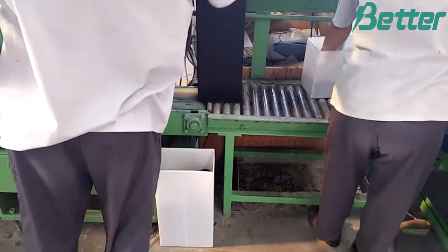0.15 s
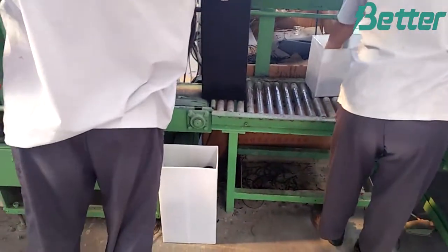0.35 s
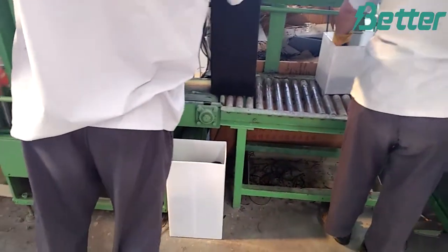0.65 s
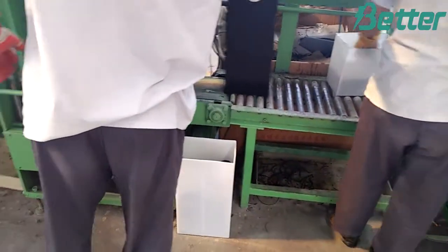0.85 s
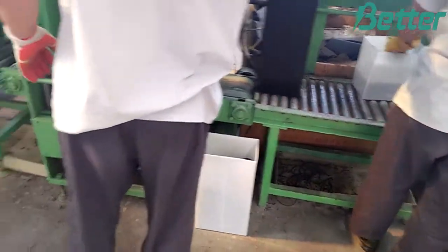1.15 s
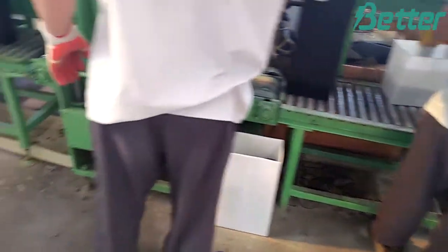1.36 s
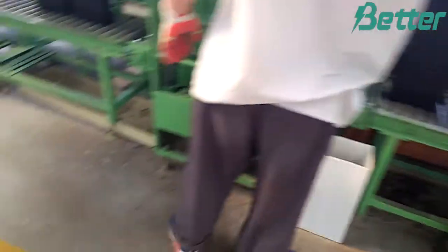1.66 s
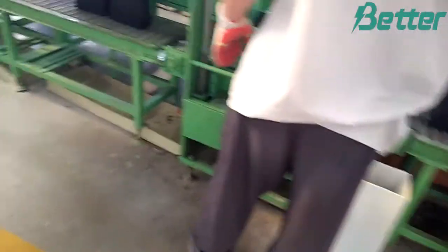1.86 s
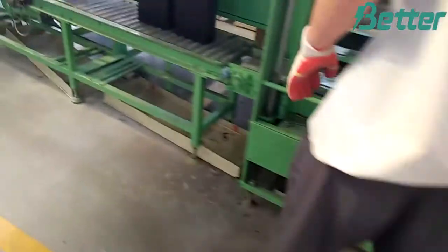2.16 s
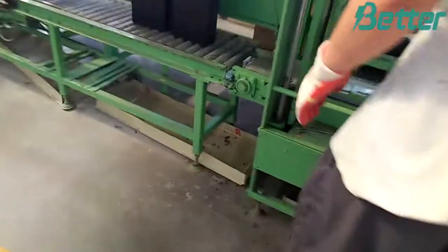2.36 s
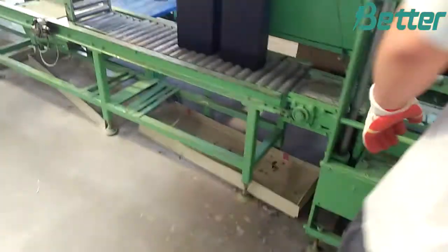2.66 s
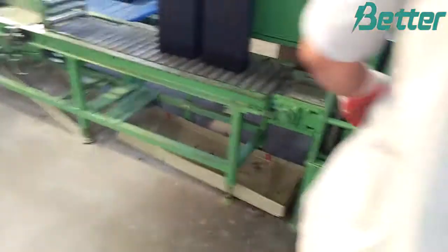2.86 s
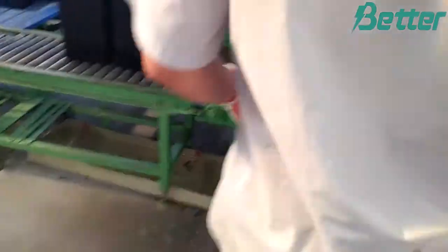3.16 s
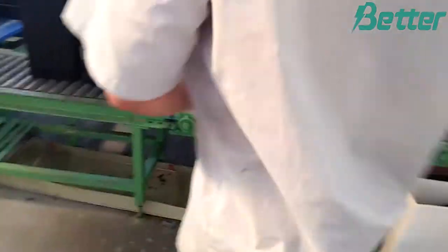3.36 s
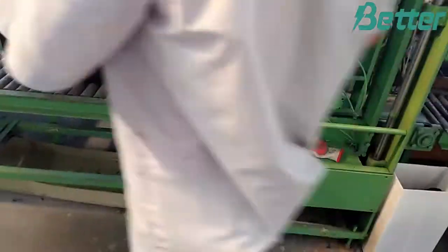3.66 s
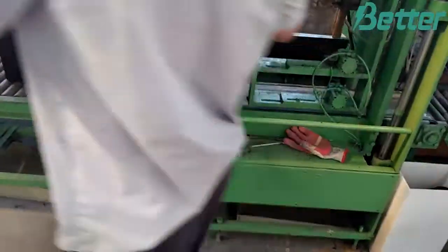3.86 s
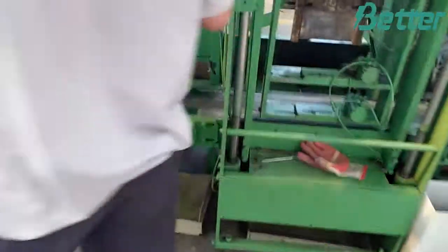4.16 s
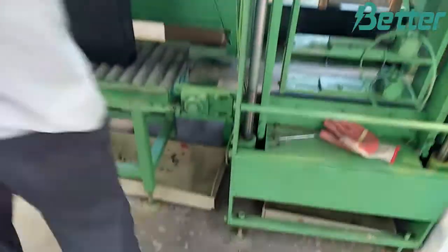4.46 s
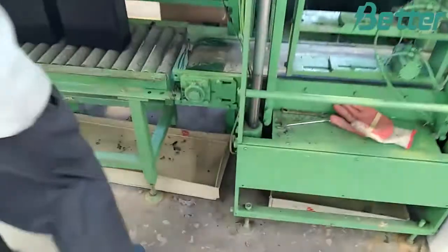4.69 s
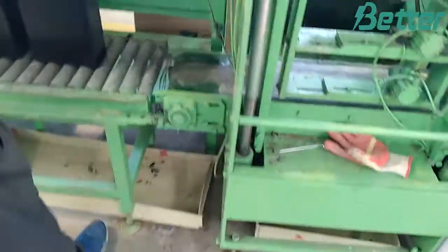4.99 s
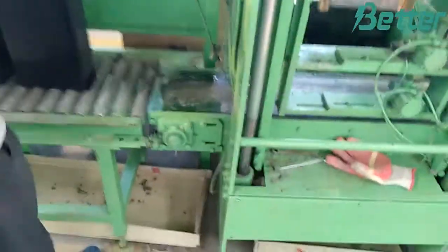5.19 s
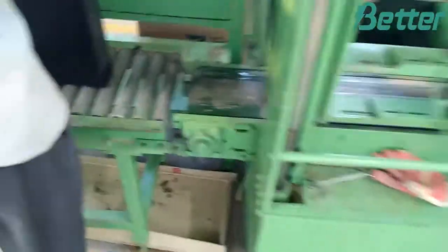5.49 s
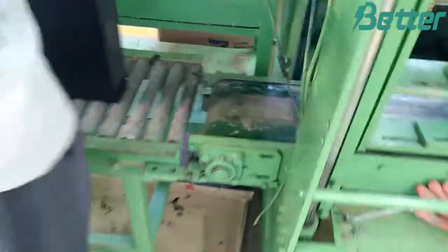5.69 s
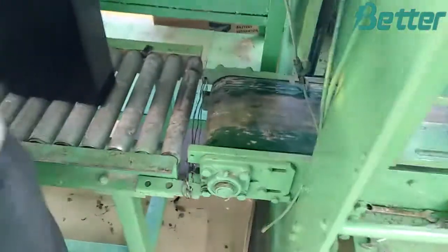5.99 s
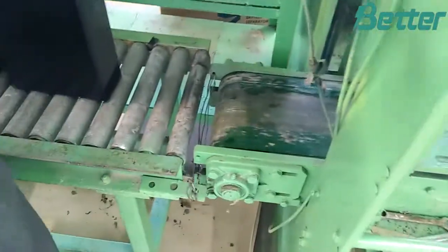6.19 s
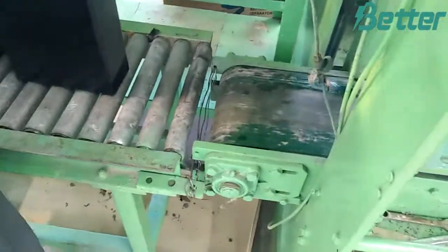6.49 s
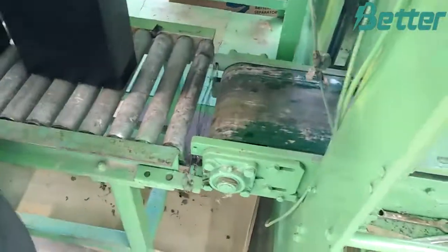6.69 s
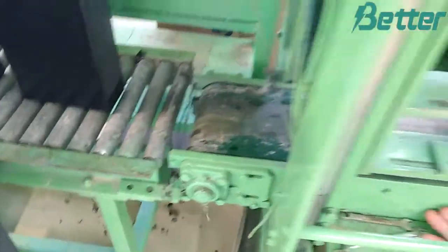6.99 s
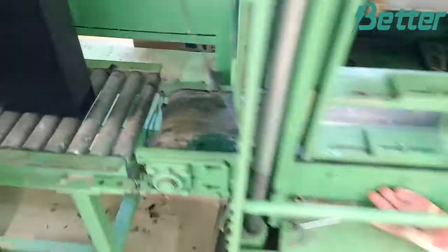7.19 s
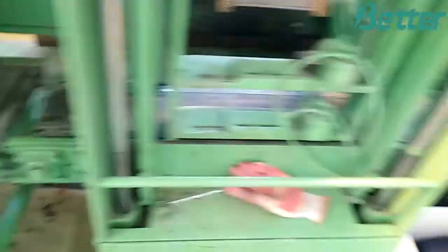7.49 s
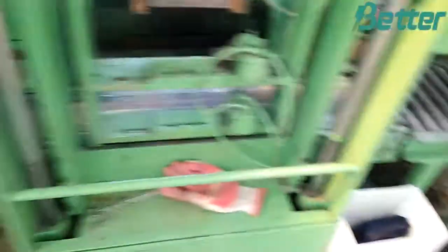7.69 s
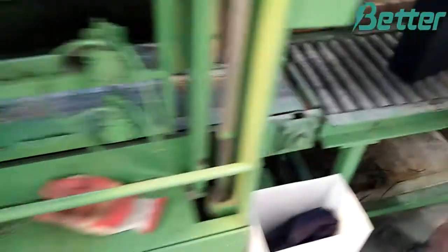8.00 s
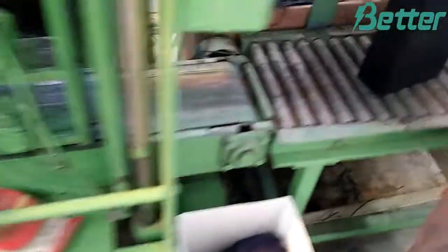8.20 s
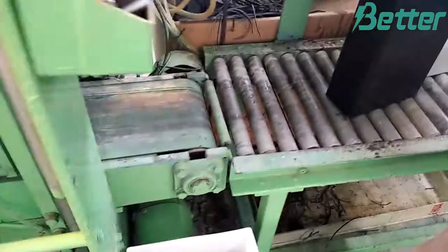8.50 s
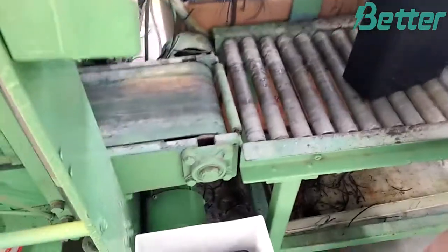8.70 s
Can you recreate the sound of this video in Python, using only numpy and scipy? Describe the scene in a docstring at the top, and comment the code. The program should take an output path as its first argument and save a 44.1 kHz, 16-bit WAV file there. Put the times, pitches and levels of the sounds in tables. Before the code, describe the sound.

Bright leaking-air hiss and piercing, unsteady squeals over dull motor rumble and hall roar, with a few hollow knocks and one sharp click.

```python
"""A factory hall near a pneumatic machine, heard by a camera carried along the line.
Compressed air hisses from leaks and nozzles: noise shaped by two bright humps and a treble shelf.
As the camera turns, the humps slide in pitch and level. Now and then the air locks into a thin whistle,
a tone shaken by noise. Behind it, shaped noise makes the motor rumble and the roar of the hall;
boxes knock on rollers as fading tones with short noise, and a pipe gives one hollow hoot."""
import sys
import numpy as np
from scipy import signal
from scipy.fft import rfft, irfft, next_fast_len
from scipy.io import wavfile
from scipy.ndimage import uniform_filter1d, map_coordinates

SR = 44100
rng = np.random.default_rng(int(sys.argv[2]) if len(sys.argv) > 2 else 0)


def inscribe(sig):
    """Save sig as 16-bit PCM at rate SR to the path in sys.argv[1].

    A 1-D sig is mono; a 2-D sig holds one channel per row.
    Samples are clipped to [-1, 1] before scaling.
    """
    pcm = np.round(np.clip(np.atleast_2d(sig).T, -1, 1) * 32767)
    wavfile.write(sys.argv[1], SR, pcm.astype(np.int16))


N = 390255  # length in samples

# Far machines over time, before wavering:
# time_s, rumble_db, low_hum_db, high_hum_db, roar_db, upper_roar_db
HALL_LEVELS = [(0.0, -43, -55, -61, -33.5, -29.5), (0.34, -49, -57, -64, -38, -39.5),
               (0.67, -38.5, -54, -58, -36.5, -33.5), (0.88, -52, -48, -46, -36, -37),
               (1.33, -56, -50, -51, -37.5, -37), (1.77, -36, -57, -38, -35.5, -36),
               (2.09, -51, -46, -40, -39, -35.5), (2.36, -41, -46, -50, -33.5, -33.5),
               (2.81, -43.5, -51, -36, -38.5, -38), (3.13, -37.5, -44, -37.5, -35.5, -34.5),
               (3.47, -47, -44, -39, -37, -34), (3.82, -31.5, -41, -37.5, -41, -32.5),
               (4.14, -42, -55, -43.5, -36, -35), (4.53, -45, -56, -55, -46.5, -43),
               (4.78, -47, -42, -44.5, -42, -64), (5.08, -40, -32, -64, -38, -35.5),
               (5.69, -35.5, -36, -38, -37.5, -37), (5.96, -36, -35, -44, -35.5, -33),
               (6.26, -36, -36.5, -35, -36.5, -35.5), (6.87, -42, -28.5, -43.5, -35, -41),
               (7.84, -41.5, -38.5, -41, -35, -30), (8.16, -53, -39, -57, -37.5, -35),
               (8.48, -47, -41.5, -61, -39, -33), (8.85, -43, -38, -56, -31.5, -32.5)]
# Two blurred motor tones: low_hz, high_hz, width_octaves
MOTOR_HUMS = (139.3, 180.7, 0.3)
# Tone colour of the motor rumble, only its shape counts: pitch_hz, relative_db
RUMBLE_COLOUR = [(25, -40), (40, -29), (52, -3.5), (75, -5.5), (105, -7.5), (150, -12), (300, -99)]
# Tone colour of the hall's roar, only its shape counts: pitch_hz, relative_db
ROAR_COLOUR = [(170, -3), (240, 0.5), (330, -0.5), (600, -1.5), (950, -5), (1200, -14), (2000, -34.5)]
# Tone colour of the upper roar, only its shape counts: pitch_hz, relative_db
UPPER_ROAR_COLOUR = [(800, -41), (1100, -5), (1500, -1), (2100, 3.5), (2800, 9.5), (3600, 8.5), (4400, 7.5),
                     (6000, -35)]
# Boxes knocking on rollers: start_s, level_db, boom_db, crack_db (the last two relative to the knock)
BOX_KNOCKS = [(.70, -25, -16, -2), (.945, -32.5, -12, -10), (1.759, -27.5, 16, -20), (3.041, -27, -8, -9),
              (5.658, -31, 9, -20), (7.72, -16, 6.5, -6), (8.126, -12, 3.5, -14), (8.772, -18, 12, 5.5)]
# Ringing box walls, before random scatter: pitch_hz, relative_db, fall_by_60_db_s
BOX_WALLS = [(625, 4.5, 0.068), (972, -2, 0.086), (1235, -8, 0.063)]
# Air inside the box: pitch_hz, fall_by_60_db_s, rise_s, delay_s
BOX_AIR = (233, .095, .004, .006)
# Ringing rollers, before random scatter: pitch_hz, relative_db, fall_by_60_db_s
ROLLERS = [(1780, 0, .022), (2350, -7, .02), (2850, -3, .02), (3400, -5, .02)]
# Dull noise of the blow: low_pass_hz, fall_by_60_db_s, relative_db
BLOW_THUD = (1000, .055, -3)
# Second contact of a knock: delay_s, relative_db
SECOND_CONTACT = (0.01, 0)
# Bare taps on the rollers: start_s, level_db
ROLLER_TAPS = [(7.0, -10.5)]
# Short hollow pipe sounds: start_s, pitch_hz, level_db, third_harmonic_db, fall_by_60_db_s
PIPE_HOOTS = [(2.405, 770, -18.5, -3.5, 0.22)]
# Single throbs of the stuttering whistle: peak_s, peak_db, half_length_s
WHISTLE_THROBS = [(0.817, -17, 0.0093), (0.838, -13.5, 0.014), (0.86, -13, 0.014), (0.884, -14, 0.015),
                  (0.904, -13, 0.023), (0.94, -13, 0.021), (0.97, -21, 0.011), (1.004, -15, 0.019),
                  (1.037, -18, 0.013), (1.058, -21, 0.01), (1.106, -17.5, 0.035), (1.186, -17, 0.042),
                  (7.17, -20, 0.0073), (7.193, -14, 0.013), (7.219, -15, 0.012), (7.244, -17, 0.0064),
                  (7.266, -21, 0.015), (7.288, -10.5, 0.0094), (7.302, -14.5, 0.018), (7.348, -17, 0.014),
                  (7.371, -17, 0.0094), (7.404, -12.5, 0.012), (7.422, -20, 0.011), (7.444, -14.5, 0.017),
                  (7.476, -18, 0.0095)]
# Tones of the stutter in each half of the scene: pitch_hz, companion_hz, companion_db
STUTTER_TONES = [(4120, 3890, -14), (3605, 3380, -13)]
# Main whistle, one curve per burst, before beating: time_s, pitch_hz, level_db
WHISTLE_BURSTS = [
    [(.78, 4140, -30), (.83, 4135, -20.5), (1.2, 4115, -31.5), (1.24, 4110, -30)],
    [(1.24, 4110, -29), (1.4, 4120, -32), (1.462, 4150, -48), (1.478, 4150, -28), (1.62, 4150, -40)],
    [(1.7, 4120, -38), (1.76, 4110, -24), (2.124, 4120, -32), (2.15, 4130, -26), (2.2, 4180, -29)],
    [(3.24, 3670, -42), (3.34, 3660, -16.5), (3.404, 3633, -15), (3.698, 3586, -22), (3.724, 3650, -20.5),
     (3.94, 3650, -30), (3.962, 3630, -26), (4.122, 3700, -41), (4.2, 3700, -31)],
    [(4.3, 3435, -37), (4.356, 3450, -16), (4.468, 3520, -12.5), (4.988, 3484, -13), (5.012, 3470, -17.5),
     (5.038, 3534, -13.5), (5.21, 3530, -19), (5.23, 3480, -29), (5.27, 3510, -17.5), (5.362, 3440, -21.5),
     (5.374, 3450, -20.5), (5.55, 3410, -22), (5.594, 3470, -16.5), (5.686, 3430, -21), (5.73, 3440, -31),
     (5.74, 3470, -20)],
    [(5.74, 3450, -19), (5.768, 3420, -26), (5.78, 3335, -15.5), (6.018, 3350, -23), (6.024, 3390, -29),
     (6.05, 3340, -20.5), (6.4, 3350, -44)],
    [(6.72, 3370, -54), (6.764, 3400, -30.5), (6.952, 3380, -31), (6.974, 3370, -39), (7.002, 3370, -23),
     (7.012, 3390, -27), (7.16, 3370, -26.5)],
    [(7.15, 3600, -31), (7.19, 3600, -20.5), (7.48, 3550, -26.5), (7.72, 3570, -28), (7.9, 3580, -44)],
]
# Breathy share of each burst (0-1)
BURST_BREATH = [0.32, .1, 0.53, .2, 0.21, 0.78, 0.046, 0.95]
# How deeply each burst beats until it locks (0-1)
BURST_CHATTER = [0.22, 0.16, 0.18, 0.12, 0.23, 0.19, 0.19, 0.36]
# Side whistles and narrow puffs of air: start_s, end_s, first_hz, last_hz, level_db, breathy_share (0-1)
SIDE_WHISTLES = [(0, 0.284, 1540, 1558, -37.5, 0.97), (0, .58, 5180, 4970, -27, 0.95),
                 (0.697, 0.738, 3720, 3840, -26, .8), (1.72, 2.05, 3980, 3900, -33.5, .8),
                 (1.82, 1.89, 5750, 5800, -28, .6), (2.26, 2.408, 4980, 4900, -27, 0.8),
                 (2.282, 2.51, 6200, 6200, -24.5, 0.4), (2.273, 2.45, 8470, 8600, -28, .5),
                 (2.383, 2.688, 3990, 4140, -25.5, 0.87), (2.604, 2.92, 5400, 5500, -33.5, 0.4),
                 (2.61, 3, 5950, 6060, -38, 0.4), (2.953, 3.337, 6140, 9900, -33.5, .9),
                 (3.102, 3.612, 3250, 3170, -32, 0.4), (3.235, 3.558, 10100, 9800, -29, 0.05),
                 (3.522, 3.663, 4710, 4700, -22.5, 1), (3.705, 4.013, 4520, 4310, -29.5, .4),
                 (3.698, 3.965, 6200, 6000, -27.5, 0.6), (4.329, 4.41, 2950, 2950, -24, 0.97),
                 (5.091, 5.281, 5080, 5600, -22, 0.75), (6.056, 6.26, 5100, 4930, -29, 0.1),
                 (6.25, 6.8, 2955, 2976, -40.5, 0.48), (7.016, 7.101, 1270, 1190, -32.5, 1),
                 (7.196, 7.601, 3430, 3344, -32, 0.2), (7.217, 7.337, 1960, 1890, -38, .1),
                 (7.52, 7.72, 4700, 5240, -28, 1), (7.97, 8.096, 6120, 5870, -25.5, 1),
                 (8.002, 8.193, 4500, 4380, -31, .5), (8.3, 8.46, 4100, 4050, -28, 1)]
# Air hiss over time, before flutter, gusts and blasts:
# time_s, low_hump_hz, low_hump_db, high_hump_hz, high_hump_db, top_hiss_db
AIR_JETS = [(0.0, 5150, -25, 7900, -30, -29), (0.71, 4770, -27.5, 8400, -35, -32),
            (0.81, 4580, -28, 7550, -33, -39.5), (1.31, 4720, -35, 8290, -41, -47),
            (1.55, 5030, -31.5, 7770, -25, -38), (2.12, 5280, -30.5, 7500, -30, -42.5),
            (2.24, 4670, -32, 7000, -26.5, -25.5), (2.31, 4900, -18.5, 7760, -22, -29.5),
            (2.59, 5170, -29.5, 7600, -25, -32), (2.66, 5270, -23.5, 7260, -25, -31.5),
            (2.88, 5400, -26, 7900, -25.5, -32), (3.13, 5450, -30.5, 7200, -27.5, -38),
            (3.25, 4970, -33.5, 8450, -23, -34.5), (3.62, 4770, -25.5, 9050, -25, -30),
            (3.7, 4970, -28, 8450, -25, -35), (3.89, 4610, -24, 8400, -30, -37),
            (4.11, 4770, -32, 8300, -42.5, -36), (4.26, 4900, -26.5, 8950, -34.5, -32.5),
            (4.36, 4770, -20.5, 7210, -35, -27.5), (4.41, 4750, -31, 7900, -30.5, -35),
            (4.8, 4840, -31.5, 7800, -37, -41.5), (5.0, 4770, -27, 8160, -39, -34.5),
            (5.25, 5300, -27.5, 7910, -32.5, -32), (5.4, 4940, -27.5, 7490, -33, -34.5),
            (5.54, 4850, -24, 7870, -30, -35.5), (5.72, 5150, -28.5, 7550, -40, -39),
            (5.79, 4750, -27.5, 7500, -31.5, -40), (6.06, 4940, -30, 7920, -33, -34),
            (6.73, 5100, -30.5, 8020, -34.5, -33.5), (7.17, 4900, -29, 7830, -32, -28),
            (7.37, 4900, -32, 8000, -31, -42), (7.56, 4700, -25.5, 7450, -30, -42),
            (7.71, 5040, -22.5, 7300, -25.5, -39), (7.94, 5000, -26.5, 7200, -31, -43),
            (7.99, 5000, -26, 7460, -26, -37), (8.43, 4800, -29.5, 7740, -26.5, -31),
            (8.7, 5070, -30.5, 7800, -44, -42), (8.85, 4700, -30.5, 7300, -41, -38)]
# Tone colour of the top hiss, only its shape counts: pitch_hz, relative_db
TOP_COLOUR = [(8500, 6), (10500, 12), (12000, 11.5), (14500, 14.5)]
# Left-right difference of the hiss, before a further 2 dB cut: pitch_hz, relative_to_centre_db
SIDE_COLOUR = [(3500, -53), (4500, -57), (6000, -20), (7500, -8.5), (10000, -2.5), (14300, -3.5)]
# Sudden changes of the hiss, a negative rise being a dip: start_s, rise_db, fall_by_60_db_s
AIR_BLASTS = [(1.37, 7, 0.46), (2.29, -2.5, 0.5), (4.36, 4.5, 0.23), (4.42, 11.5, 0.1), (4.68, 8.5, 0.28),
              (5.01, 5, 0.24), (5.2, 4, 0.46), (5.77, -1, .5), (6.06, 4.5, 1.3), (8.02, 1.5, 0.54),
              (8.775, 5.5, 0.97)]

TOP_HZ = 14300  # nothing is kept from here up
FRAME = 512  # samples
BLAST_RISE_S = 0.0053
FLUTTER_DB, FLUTTER_RATE, WANDER = 1, 11, 0.0039  # hiss unrest: depth, knots a second, share of pitch
WAVER_DB, WAVER_RATE = 1, 5  # each motor sound swells on its own: depth, knots a second
CHATTER_HZ, CHATTER_UNEVEN = 44.76, 0.198  # beats a second, and their wander as a share
# The whistle steadies from this level up, over this range, to this share
LOCK_DB, LOCK_RANGE_DB, LOCK_MOST = -19, 6, 0.43


def amp(db):
    """Turn decibels into a plain factor."""
    return 10 ** (np.asarray(db) / 20)


def unit(x):
    """Scale a signal to an average strength (RMS) of one."""
    return x / np.sqrt(np.mean(np.abs(x) ** 2) + 1e-20)


def along(points, hz):
    """Read a curve of (Hz, value) points on a log pitch axis."""
    f, v = np.transpose(points)
    return np.interp(np.log(hz + 1), np.log(f + 1), v)


def curves(rows, t):
    """Read each column after the time column at times t."""
    s, *cols = np.transpose(rows)
    return [np.interp(t, s, c) for c in cols]


def wobble(rate, count):
    """A smooth random curve, rate knots a second."""
    knots = rng.standard_normal(int(count * rate / SR) + 4)
    return map_coordinates(knots, [np.arange(count) * rate / SR])


def unrest(rate, t):
    """A wobble read at times t."""
    return np.interp(t, np.arange(N) / SR, wobble(rate, count=N))


def patchy(colour, patchy_db, streak_db, size):
    """Noise coloured by colour(Hz, s), with broad patches and thin lasting streaks of random gain."""
    hz, t, z = signal.stft(rng.standard_normal(N), SR, nperseg=size)
    patches = uniform_filter1d(rng.standard_normal(z.shape), size=5, axis=0)
    patches = uniform_filter1d(patches, size=5, axis=1)
    streaks = uniform_filter1d(rng.standard_normal(z.shape), size=25, axis=1)
    gain = colour(hz[:, None], t) * amp(patchy_db * unit(patches) + streak_db * unit(streaks))
    return signal.istft(z * gain, SR, nperseg=size)[1][:N]


def levelled(shape, db):
    """Scale a spectral shape so that white noise through it has the given level in every frame."""
    return shape / np.sqrt(np.mean(shape ** 2, axis=0)) * amp(db)


def hump(hz, centre_hz, width, skirt_db):
    """A broad resonance, width in octaves, added to a wider skirt."""
    octaves = np.log2((hz + 1) / centre_hz)
    core = np.exp(-(octaves / width) ** 2)
    return core + amp(skirt_db) * np.exp(-(octaves / (1.83 * width)) ** 2)


def hall(hz, t):
    """Spectrum of the far machines: rumble, two motor hums and reverberant roar, adding in power."""
    *motors_db, roar_db, upper_db = curves(HALL_LEVELS, t)
    rumble_db, low_db, high_db = (db + WAVER_DB * unrest(WAVER_RATE, t) for db in motors_db)
    low_hz, high_hz, width = MOTOR_HUMS
    layers = [levelled(amp(along(RUMBLE_COLOUR, hz)), rumble_db),
              levelled(hump(hz, low_hz, width, skirt_db=8), low_db),
              levelled(hump(hz, high_hz, width, skirt_db=0), high_db),
              levelled(amp(along(ROAR_COLOUR, hz)), roar_db),
              levelled(amp(along(UPPER_ROAR_COLOUR, hz)), upper_db)]
    return np.sqrt(sum(layer ** 2 for layer in layers))


def ring(modes, t):
    """A struck body rings in several fading tones, with new random strengths at each blow."""
    out = 0
    for hz, db, t60 in modes:
        level_db = db + rng.normal(0, 2)
        out = out + amp(level_db - 60 * t / t60) * np.sin(2 * np.pi * hz * t)
    return out


def dull_noise(cutoff_hz, count):
    """Noise of a contact, with the treble above the cutoff weakened."""
    b, a = signal.butter(2, cutoff_hz, fs=SR)
    return unit(signal.lfilter(b, a, rng.standard_normal(count)))


def knocks():
    """A knock thuds, cracks with two contacts, rings walls and rollers; the air in the box swells late."""
    out, t = np.zeros(N + SR), np.arange(SR // 4) / SR
    boom_hz, boom_t60, rise, delay = BOX_AIR
    thud_hz, thud_t60, thud_db = BLOW_THUD
    again_s, again_db = SECOND_CONTACT
    late, again = np.maximum(t - delay, 0), t - again_s
    for s, db, boom_db, crack_db in BOX_KNOCKS:
        boom_swell = amp(boom_db - 60 * late / boom_t60) * (1 - np.exp(-late / rise))
        boom = boom_swell * np.sin(2 * np.pi * boom_hz * late)
        thud = amp(thud_db - 60 * t / thud_t60) * dull_noise(thud_hz, len(t))
        contacts = amp(-60 * t / 0.034) + (again > 0) * amp(again_db - 60 * again / 0.05)
        crack = amp(-4) * ring(ROLLERS, t) + contacts * dull_noise(6500, len(t))
        walls = amp(-6) * ring(BOX_WALLS, t)
        knock = walls + thud + boom + amp(crack_db) * crack
        out[round(s * SR):][:len(t)] += amp(db) * knock
    for s, db in ROLLER_TAPS:
        tap = ring(ROLLERS, t) + amp(-60 * t / .02) * dull_noise(6000, len(t))
        out[round(s * SR):][:len(t)] += amp(db) * (1 - np.exp(-t / .002)) * tap
    return out[:N]


def drift(width_hz, count):
    """Complex noise of one resonance: a sharp core with soft skirts."""
    pole = np.exp(-2 * np.pi * width_hz / SR)
    lead_in = SR // 20  # lets the filter settle
    white = rng.standard_normal(count + lead_in) + 1j * rng.standard_normal(count + lead_in)
    return unit(signal.lfilter([1], [1, -2 * pole, pole ** 2], white)[lead_in:])


def edge_tone(hz, breathy, steady):
    """Turbulence shakes the phase and strength of an edge tone; a strong lock evens the strength out."""
    share = np.clip(breathy, 0, 1)
    lift = np.exp(2j * np.pi * 45 * np.arange(len(hz)) / SR)  # the breath sits 45 Hz higher
    breath = drift(205, count=len(hz)) * lift
    z = np.sqrt(1 - share) * drift(54, count=len(hz)) + np.sqrt(share) * breath
    z = z * (np.abs(z) + 1e-3) ** -np.clip(steady, 0, 1)
    phase = 2 * np.pi * np.cumsum(hz) / SR
    tone = np.sqrt(2) * np.real(z * np.exp(1j * phase))
    faint_octave = amp(-31) * np.real(z * z * np.exp(2j * phase))
    return tone + faint_octave


def hoots():
    """A closed pipe, blown roughly, sounds its first and third harmonic briefly."""
    out, t = np.zeros(N + SR), np.arange(SR // 2) / SR
    for s, hz, db, third_db, t60 in PIPE_HOOTS:
        swell = amp(db - 60 * t / t60) * (1 - np.exp(-t / 0.0038))
        first, third = (edge_tone(k * hz + 0 * t, breathy=.1, steady=.7) for k in (1, 3))
        out[round(s * SR):][:len(t)] += swell * (first + amp(third_db) * third)
    return out[:N]


def throbs():
    """The whistle stutters: each throb is a short clean swell of a tone and a weaker one below it."""
    out = np.zeros(N)
    for s, db, length in WHISTLE_THROBS:
        hz, low_hz, low_db = STUTTER_TONES[int(s > N / SR / 2)]
        t = np.arange(-round(length * SR), round(length * SR)) / SR
        swell = np.cos(np.pi / 2 * t / length) ** 2
        turn = 2 * np.pi * rng.random(size=2)  # random starting phases
        tone = np.sin(2 * np.pi * hz * t + turn[0])
        companion = amp(low_db) * np.sin(2 * np.pi * low_hz * t + turn[1])
        out[round(s * SR) - len(t) // 2:][:len(t)] += amp(db) * swell * (tone + companion)
    return out


def whistle():
    """Air locks into a main tone that beats until it is strong; side whistles swell and fade beside it."""
    out = np.zeros(N)
    beat_hz = CHATTER_HZ * (1 + CHATTER_UNEVEN * wobble(15, count=N))
    beat = np.cos(2 * np.pi * np.cumsum(beat_hz) / SR)
    for rows, breathy, chatter in zip(WHISTLE_BURSTS, BURST_BREATH, BURST_CHATTER):
        a, b = round(rows[0][0] * SR), round(rows[-1][0] * SR)
        t = np.arange(a, b) / SR
        hz, db = curves(rows, t)
        lock = np.clip((db - LOCK_DB) / LOCK_RANGE_DB, 0, 1)
        fade = np.clip(np.minimum(t - t[0], t[-1] - t) / 0.0024, 0, 1)
        beating = 1 + chatter * (1 - lock) * beat[a:b]
        out[a:b] += amp(db) * fade * beating * edge_tone(hz, breathy, LOCK_MOST * lock)
    for start, end, first_hz, last_hz, db, breathy in SIDE_WHISTLES:
        a, b = round(start * SR), round(end * SR)
        swell = np.sin(np.linspace(0, np.pi, b - a)) ** 0.31
        glide = np.linspace(first_hz, last_hz, b - a)
        out[a:b] += amp(db) * swell * edge_tone(glide, breathy, 0)
    return out


def blasts(t):
    """Gain in dB of the air blasts: a quick change of power that then dies away."""
    since = np.maximum(t - np.array(AIR_BLASTS)[:, :1], 0)
    db, t60 = np.array(AIR_BLASTS)[:, 1:].T[..., None]
    fall = amp(-120 * since / t60)  # twice the dB, since this scales power
    extra = (amp(db) ** 2 - 1) * fall * (1 - np.exp(-since / BLAST_RISE_S))
    return 10 * np.log10(1 + extra.sum(axis=0))


def jets(unsteady):
    """Spectrum of the air hiss: two sliding humps and a top shelf, adding in power."""
    def colour(hz, t):
        low_hz, low_db, high_hz, high_db, top_db = curves(AIR_JETS, t)
        low_bend, low_flutter, high_bend, high_flutter, top_flutter = [
            np.interp(t, np.arange(N) / SR, u) for u in unsteady]
        low = levelled(hump(hz, low_hz * (1 + WANDER * low_bend), width=0.28, skirt_db=3),
                       low_db + FLUTTER_DB * low_flutter)
        high = levelled(hump(hz, high_hz * (1 + WANDER * high_bend), width=0.27, skirt_db=43),
                        high_db + FLUTTER_DB * high_flutter)
        top = levelled(amp(along(TOP_COLOUR, hz)) * (hz < TOP_HZ), top_db + FLUTTER_DB * top_flutter)
        return amp(blasts(t)) * np.sqrt(low ** 2 + high ** 2 + top ** 2)
    return colour


def scene():
    """Everything is centred but the high hiss, which differs left and right in flickering patches."""
    far = patchy(hall, patchy_db=3.0, streak_db=1.3, size=4 * FRAME)
    hiss = jets([wobble(FLUTTER_RATE, count=N) for _ in range(5)])
    gusts = amp(0.11 * wobble(8.3, count=N) + 0.84 * wobble(25, count=N))
    air = gusts * patchy(hiss, patchy_db=2.5, streak_db=2.0, size=FRAME)
    centre = far + knocks() + hoots() + throbs() + whistle() + air

    def side_hiss(hz, t):
        """The hiss, limited to the pitches that differ between the two sides."""
        return hiss(hz, t) * amp(along(SIDE_COLOUR, hz) - 2.0)

    apart = patchy(side_hiss, patchy_db=6, streak_db=-2.0, size=2 * FRAME)
    return np.array([centre + apart, centre - apart])


def record(dry):
    """The camera rounds off the highest peaks, cuts the deepest bass and keeps nothing from TOP_HZ up."""
    soft = dry / (1 + np.abs(dry / .75) ** 6) ** (1 / 6)
    bass_cut = signal.butter(4, 42, "high", fs=SR, output="sos")
    soft = signal.sosfilt(bass_cut, soft)
    m = next_fast_len(N + SR // 2)
    kept = np.fft.rfftfreq(m, 1 / SR) < TOP_HZ
    return irfft(rfft(soft, m) * kept, m)[:, :N]


dry = scene()
out = record(dry)
inscribe(out)
```